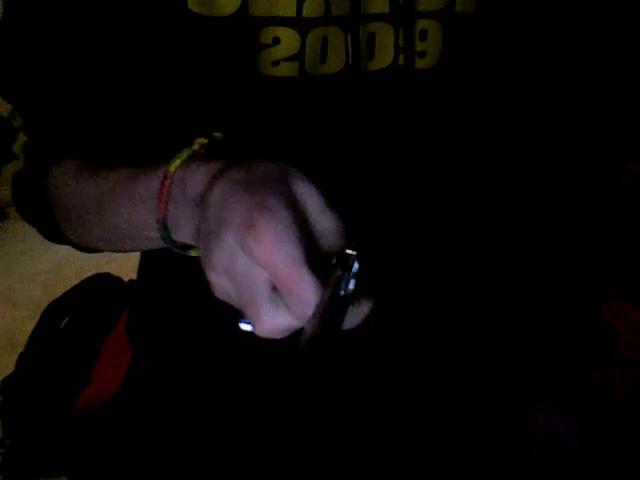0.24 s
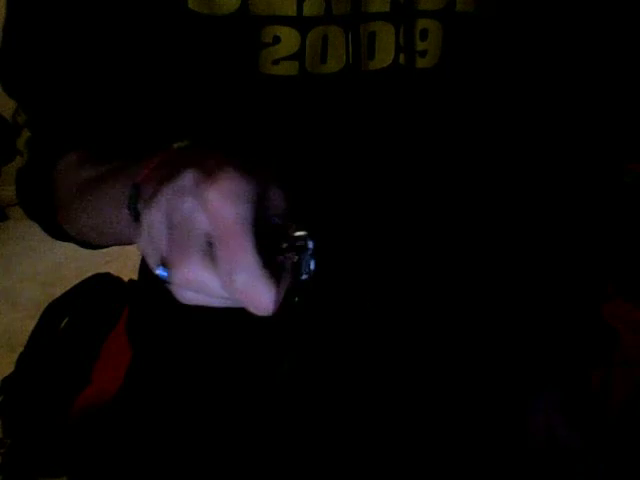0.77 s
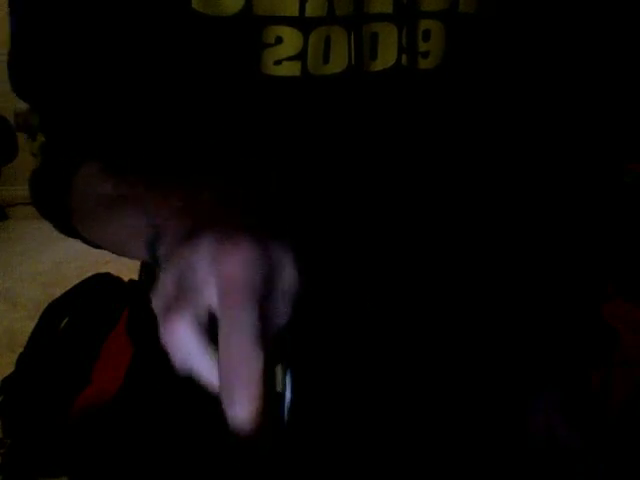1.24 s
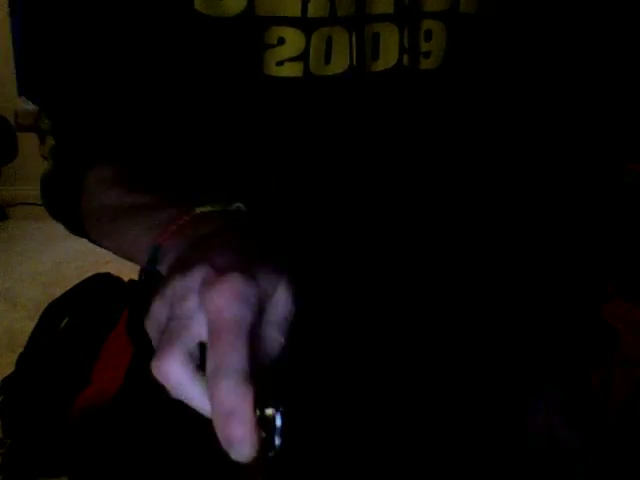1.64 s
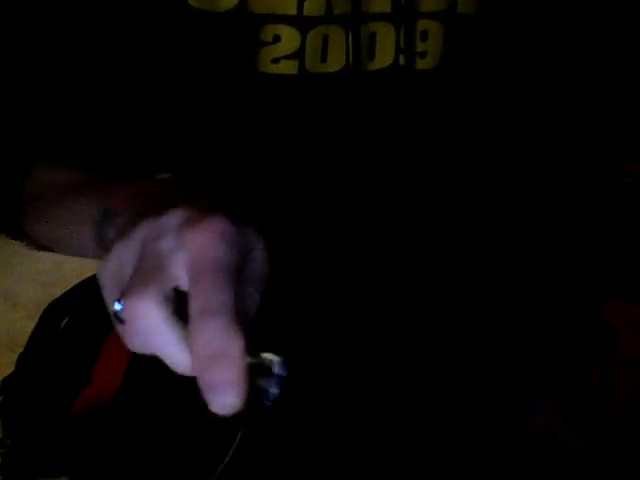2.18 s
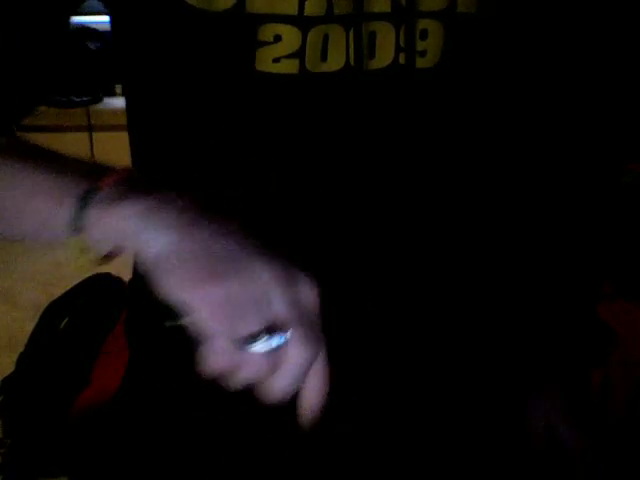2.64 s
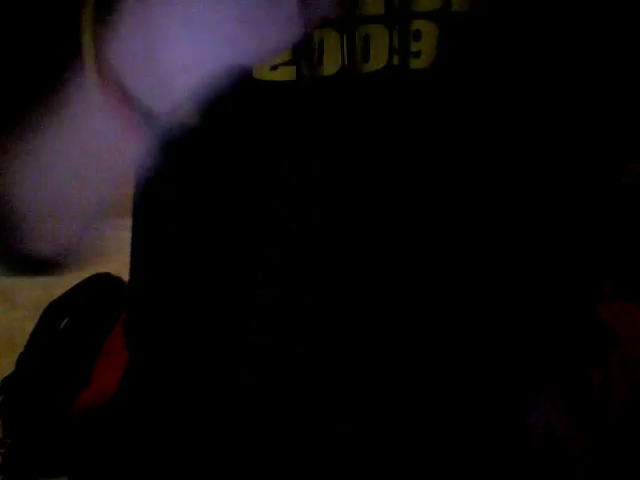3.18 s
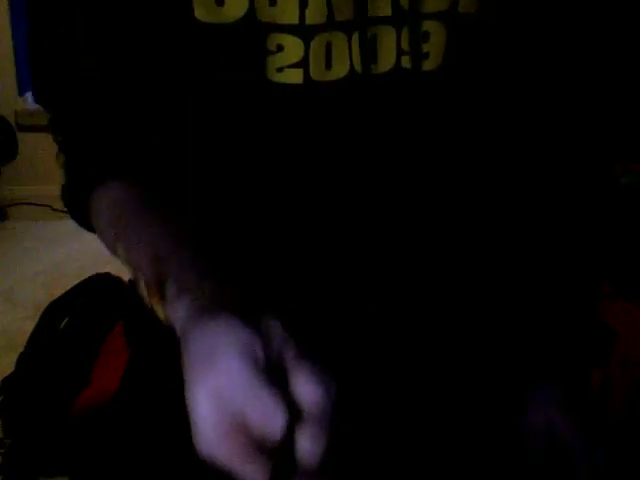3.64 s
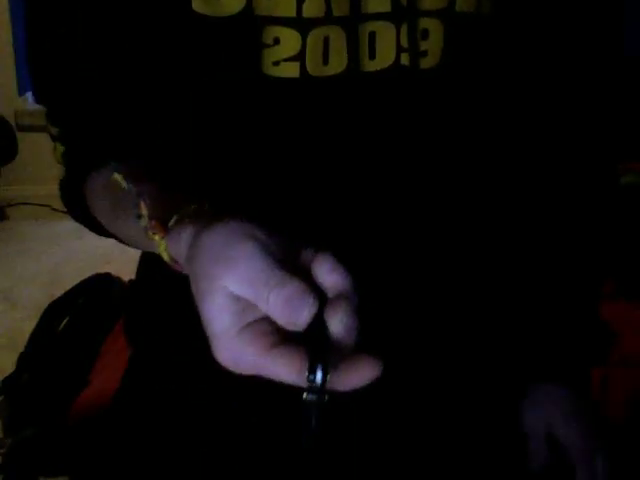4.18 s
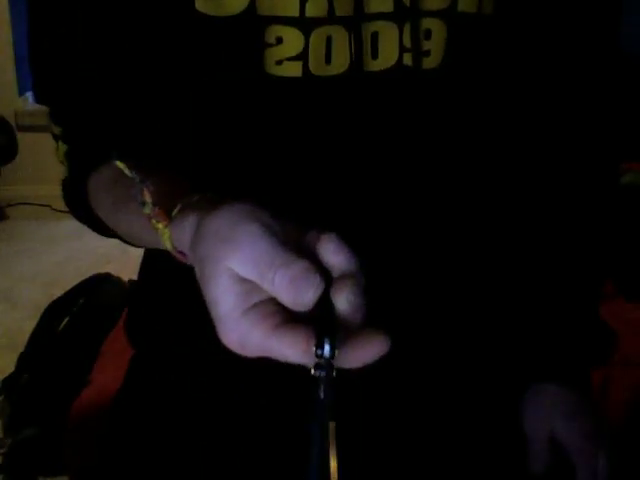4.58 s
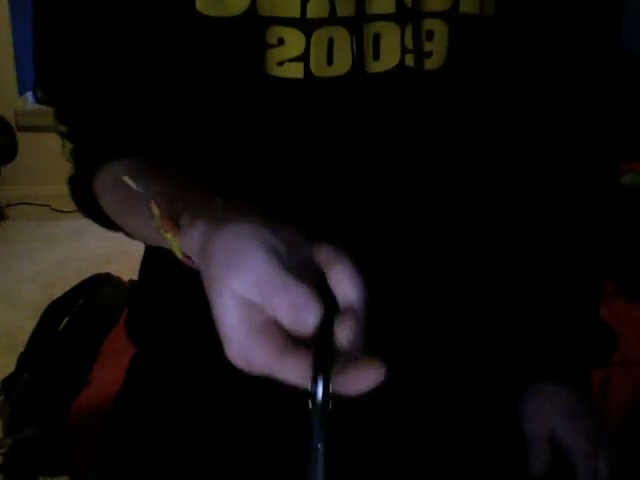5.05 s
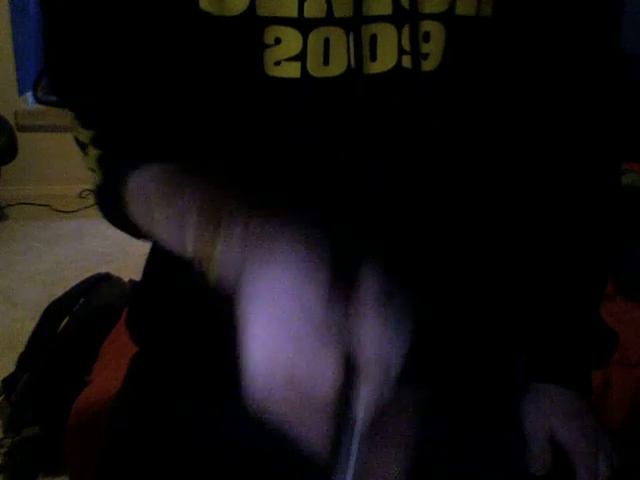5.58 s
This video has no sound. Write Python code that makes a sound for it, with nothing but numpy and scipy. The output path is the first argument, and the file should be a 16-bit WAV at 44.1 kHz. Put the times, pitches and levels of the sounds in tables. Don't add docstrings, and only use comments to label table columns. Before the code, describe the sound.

A folding knife with two steel handles is flipped close to the microphone, clacking and rattling in bursts over faint hum and camera whine.

```python
import sys
import numpy as np
from scipy import signal
from scipy.fft import rfft, irfft, next_fast_len
from scipy.io import wavfile
from scipy.ndimage import uniform_filter1d

SR = 44100
rng = np.random.default_rng(int(sys.argv[2]) if len(sys.argv) > 2 else 0)


def gain_from_decibels(decibels):
    exponent = np.asarray(decibels, float) / 20
    return 10 ** exponent


def unload_audio(sound):
    columns = np.transpose(np.atleast_2d(sound))
    steps = np.round(np.clip(columns, -1, 1) * 32767)
    wavfile.write(sys.argv[1], SR, steps.astype(np.int16))


N = 256220
SIZE = next_fast_len(N)


def evened(x):
    return x / np.sqrt(np.mean(x ** 2) + 1e-20)


def read(points, hz):
    f, value = np.transpose(points)
    return np.interp(np.log(hz + 1), np.log(f + 1), value)


def add(mix, s, sound):
    part = mix[round(s * SR):][:len(sound)]
    part += sound[:len(part)]


def shaped(x, points):
    return irfft(rfft(x) * gain_from_decibels(read(points, np.fft.rfftfreq(len(x), 1 / SR))), len(x))


def coloured(points, size):
    z = rfft(rng.standard_normal(size))
    return evened(irfft(z * gain_from_decibels(read(points, np.fft.rfftfreq(size, 1 / SR))), size))


def ring(hz, db, t60, phase=0):
    t = np.arange(round(min(t60, .4) * SR)) / SR
    twin = 0.23 * np.sin(2 * np.pi * (hz * 1.006 * t + rng.random())) * gain_from_decibels(-60 * t / 0.24)
    onset = (1 - np.exp(-t / 0.00012)) ** 2
    return gain_from_decibels(db - 60 * t / t60) * (np.sin(2 * np.pi * hz * t + phase) + twin) * onset


# f/Hz, level/dB
STEEL_MODES = [(1750, -20.5), (2450, -24), (3300, -14), (4780, -3.5), (5150, -5.5), (5680, -10),
               (6120, -0.5), (6700, -8.5), (7100, -3.5), (7460, 0), (7950, -3.5), (8650, -8), (9330, -34),
               (10300, 1.5), (10650, -16.5), (11780, -21), (12700, -8.5), (13900, -5), (15000, -3)]


def modes(t60):
    out = np.zeros(4096)
    chances = rng.random((len(STEEL_MODES), 3))
    for (hz, db), (share, detune, turn) in zip(STEEL_MODES, chances):
        add(out, 0, ring(hz * (.97 + 0.051 * detune), db - 12 * share, t60, 2 * np.pi * turn))
    return out


# f/Hz, level/dB per Hz
CRACK_SPECTRUM = [(700, -6), (1500, -11), (3000, -9), (4300, -12.5), (5500, 1.5), (7500, 0), (9000, -0.5),
                  (11000, 1), (13000, -13), (16500, -20)]


def knock(db, ring_hz, treble_db, body_db, t60):
    out = gain_from_decibels(-9) * modes(0.62 * t60)
    add(out, 0, ring(ring_hz, -9.5, t60))
    t = np.arange(4096) / SR
    tick = gain_from_decibels(0.5 + 0.15 * (db + 23) - 60 * t / 0.006) * np.minimum(t / .0003, 1)
    chatter = gain_from_decibels(-3 - 60 * t / (.5 * t60 + 0.0042)) + gain_from_decibels(-25.5 - 60 * t / 0.13)
    out += gain_from_decibels(-2.5) * shaped(rng.standard_normal(len(t)) * (tick + chatter), CRACK_SPECTRUM)
    colour = [(900, body_db + 18), (1500, body_db + 20.5), (3600, body_db + 22.5), (4600, 0), (8000, 0),
              (8800, treble_db + 10), (12000, treble_db + 5.5), (13500, treble_db)]
    return gain_from_decibels(db) * shaped(out, colour)[:-200]


# t/s, peak level/dB, main ring f/Hz, treble/dB, body/dB
HARD_CLACKS = [(0.0103, -37, 5860, -18, -19), (0.252, -38, 5920, -23, -19), (1.0536, -32, 5590, -13, -16),
               (1.1267, -35, 7330, -11, -26), (2.4044, -37, 7300, -9.5, -32), (2.6266, -39, 5370, -14, -11),
               (2.7033, -30, 5480, -5.5, -15), (2.7076, -31.5, 7400, -7, -17),
               (2.7145, -28.5, 6550, -12, -30), (2.783, -39.5, 7280, -5.5, -14),
               (2.8949, -36.5, 5900, -12, -17.5), (3.05, -26.5, 5920, -7, -18),
               (3.2688, -29, 7640, -15, -26), (3.2755, -21.5, 5680, -17, -28.5),
               (3.2807, -19, 7690, -10.5, -30), (3.2842, -23, 5520, -10, -22),
               (3.3251, -28, 7230, -8.5, -33), (3.4049, -26, 5750, -12, -18.5),
               (3.4102, -26, 7660, -3, -21), (3.488, -28.5, 7750, -16, -25),
               (3.5786, -32, 7500, -13, -16.5), (5.1074, -15.5, 6800, -10, -39),
               (5.13, -27.5, 6300, -18, -24), (5.3264, -31.5, 7230, -8.5, -24)]
# t/s, peak level/dB, main ring f/Hz
DULL_TOUCHES = [(0.2457, -44, 6020), (0.2648, -41.5, 5600), (0.2931, -44, 6530), (0.9232, -46, 7580),
                (0.993, -49, 5990), (1.0155, -46, 7400), (1.041, -44, 5910), (1.0667, -42, 5900),
                (1.2345, -46, 5800), (1.4106, -47, 5860), (1.8413, -44.5, 5800), (1.3325, -53, 6000),
                (2.65, -47, 6040), (2.6627, -41.5, 5590), (2.854, -45.5, 5890), (2.9208, -44, 5830),
                (3.4, -34, 6790), (4.186, -45.5, 6000), (5.1586, -52, 6110), (5.1814, -53, 6240),
                (5.3544, -45, 7140)]
# t/s, peak level/dB, main ring f/Hz
EDGE_GRAZES = [(0.6488, -51, 6280), (1.0966, -48, 6010), (1.199, -43, 5600), (2.6814, -55, 7080),
               (3.0283, -41.5, 5740), (3.426, -37, 6700), (3.452, -38, 5950), (3.462, -37, 5580),
               (3.5595, -43, 6900), (4.0012, -49, 5800), (4.337, -51, 5960), (5.1414, -48, 7750),
               (5.1926, -48, 5870), (5.3354, -53, 7510), (5.3794, -56, 7150), (5.6544, -51.5, 5900),
               (5.6968, -48, 5640)]


def knocks():
    light_t60_s = 0.033
    touch_treble_db, touch_body_db = -21, -21.5
    graze_treble_db, graze_body_db = -10, -18
    blows = [(*row, 0.035 * np.exp(-0.03 * (row[1] + 30))) for row in HARD_CLACKS]
    blows += [(*row, touch_treble_db, touch_body_db, light_t60_s) for row in DULL_TOUCHES]
    blows += [(*row, graze_treble_db, graze_body_db, light_t60_s) for row in EDGE_GRAZES]
    out = np.zeros(N)
    for s, *blow in blows:
        add(out, s + .001, knock(*blow))
    return out


PART_HZ = {"blade": 8188, "tang": 4570, "latch": 5900, "pin": 7465, "tip": 11850, "spine": 10350, "handle":
           7955, "edge": 11740, "slot": 10620, "grip": 1750, "bolt": 6115, "stop": 5200, "washer": 13900,
           "rib": 9500, "heel": 4200, "key": 7200, "tail": 4786}
# part, level/dB, t60/s
SWING_RINGS = [
    ("blade", -30.5, 0.23),
    ("tang", -54, .5),
    ("tail", -46, .04),
    ("latch", -43, .06),
    ("pin", -44, .079),
    ("tip", -33.5, .05),
    ("tip", -54, .2),
    ("spine", -35, .03),
]
# part, level/dB, t60/s
SHUT_RINGS = [
    ("handle", -24, 0.047),
    ("edge", -37, .11),
    ("slot", -22, 0.036),
    ("bolt", -29, .025),
    ("key", -14, .009),
    ("grip", -45, .025),
    ("tail", -41, .05),
]
# t/s, part, level/dB, t60/s
LONE_RINGS = [(.008, "spine", -60, .036), (1.054, "spine", -53, .07), (1.054, "tip", -50, .06),
              (1.127, "pin", -39, .06), (1.127, "spine", -50, 0.099), (1.842, "latch", -59, .047),
              (2.705, "spine", -43, .04), (2.716, "tip", -52, .05), (3.282, "latch", -43, .044),
              (3.286, "washer", -52, .04), (3.325, "blade", -50, .26), (3.406, "tang", -59, .16),
              (3.427, "rib", -31.5, .03), (3.4893, "handle", -26, .023), (3.579, "tip", -51, .06),
              (3.6, "tang", -65, .5), (5.1312, "handle", -32.5, 0.051), (5.16, "bolt", -44, 0.058),
              (5.193, "heel", -53, .03), (5.328, "key", -54, .16), (5.328, "stop", -50, .068)]


def ringing_parts():
    swing_s, shut_s = 3.0512, 5.1087
    rings = [(swing_s, *row) for row in SWING_RINGS] + [(shut_s, *row) for row in SHUT_RINGS]
    out = np.zeros(N)
    for s, part, db, t60 in rings + LONE_RINGS:
        sound = ring(PART_HZ[part], db, t60)
        flutter = evened(uniform_filter1d(rng.standard_normal(len(sound)), 300))
        onset = np.minimum(np.arange(len(sound)) / (.0003 * SR), 1)
        add(out, s, sound * gain_from_decibels(1.5 * flutter) * onset)
    return out


def rattle(length, db, treble_db):
    size = round(length * SR)
    hits = rng.random(size) < 1200 / SR
    taps = hits * gain_from_decibels(2.9 * rng.exponential(1, size)) * rng.choice([-1, 1], size)
    taps = taps * signal.windows.tukey(size, .5)
    colour = [(1200, -5), (3000, -3), (8000, 2.5), (9000, treble_db), (12000, treble_db),
              (13500, treble_db - 10)]
    out = shaped(signal.fftconvolve(taps, modes(0.015)), colour)
    return gain_from_decibels(db) * out / np.sqrt(np.mean(out[:size] ** 2) + 1e-20)


# t/s, length/s, rms level/dB, treble/dB
HANDLE_RATTLES = [(0.249, 0.068, -65, -12), (1.052, .025, -56, -5), (1.1265, .012, -46, -3),
                  (3.056, 0.13, -59, -9), (3.27, .018, -44, -6), (3.288, 0.042, -51, -3),
                  (3.329, .04, -59, -2), (3.401, 0.018, -40, -6), (3.424, .03, -55, 0),
                  (3.463, .018, -49, -10), (3.4855, 0.0065, -41.5, -9), (3.578, 0.025, -45.5, 1),
                  (3.599, 0.05, -59, -2), (5.094, .013, -66, -14), (5.324, 0.0097, -50.5, -2)]


def rattles():
    out = np.zeros(N)
    for s, *shake in HANDLE_RATTLES:
        add(out, s, rattle(*shake))
    return out


# t/s, length/s, f/Hz, level/dB
PIVOT_SQUEAKS = [(.005, 0.016, 5850, -46), (0.251, 0.029, 5900, -57), (1.036, 0.019, 6000, -54.5),
                 (1.412, 0.028, 5880, -65), (3.65, .017, 8400, -51.5), (3.665, 0.038, 8500, -55.5),
                 (4.001, .06, 5900, -65.5), (4.067, 0.034, 5830, -72), (4.554, 0.083, 5880, -70.5),
                 (3.103, .014, 5950, -58), (3.464, .014, 8300, -48)]


def squeaks():
    out = np.zeros(N)
    for s, length, hz, db in PIVOT_SQUEAKS:
        size = round(length * SR)
        pitch_slip, level_slip = evened(uniform_filter1d(rng.standard_normal((2, size)), 150))
        tone = np.sin(2 * np.pi * np.cumsum(hz + 40 * pitch_slip) / SR) * gain_from_decibels(4.0 * level_slip)
        add(out, s, gain_from_decibels(db + 2) * tone * signal.windows.tukey(size, .4))
    return out


def knife():
    return knocks() + ringing_parts() + rattles() + squeaks()


# t/s, f/Hz, level/dB, length/s
SEAT_BUMPS = [(1.25, 165, -56, 0.087), (3.44, 198, -55.5, 0.078), (3.55, 170, -49, 0.12),
              (3.57, 237, -54, 0.074), (3.57, 88.5, -53, 0.097), (3.72, 91, -49.5, 0.065),
              (3.81, 75, -50, .1), (3.86, 200, -55, 0.065), (4.08, 180, -57, .08), (4.21, 213.5, -56, 0.1),
              (4.22, 148, -52, 0.11), (4.6, 181.4, -56, 0.074), (4.84, 158, -48.5, 0.09),
              (4.95, 149, -61, .06), (5.22, 140, -48, 0.12), (5.23, 252, -57.5, 0.079), (5.3, 85, -55, .08),
              (5.33, 236, -51.5, 0.13), (5.36, 170.5, -54, .1), (5.44, 279, -59, 0.084)]


def seat():
    out = np.zeros(N)
    for s, hz, db, length in SEAT_BUMPS:
        u = np.arange(round(1.5 * length * SR)) / (length * SR)
        swell = np.e * 4 * u * np.exp(-4 * u) * np.cos(np.pi * u / 3)
        cycles = hz * length * u * (1 - 0.03 * u) + rng.random()
        add(out, s, gain_from_decibels(db + 1.0) * swell * np.sin(2 * np.pi * cycles))
        puff = [(.5 * hz, -30), (.7 * hz, 0), (1.5 * hz, -3), (3 * hz, -30), (6 * hz, -80)]
        add(out, s, gain_from_decibels(db - 9) * swell * coloured(puff, len(u)))
    return out


# f/Hz, t60/s
ROOM_T60 = [(500, 0.29), (3000, 0.27), (8000, 0.24), (15000, 0.04)]


def room(x):
    taps = np.zeros(SR // 2)
    at = np.arange(100, len(taps) - 20, 20)
    taps[at + rng.integers(0, 20, len(at))] = rng.choice([-1., 1.], len(at))
    hz, t, z = signal.stft(taps, SR, nperseg=128)
    decay = gain_from_decibels(-60 * t / read(ROOM_T60, hz)[:, None])
    tail = signal.istft(z * decay, SR, nperseg=128)[1]
    return signal.fftconvolve(x, tail / np.linalg.norm(tail))[:N]


# f/Hz, rms level/dB
READOUT_TONES = [(3025, -87), (4215, -91), (4484, -91), (4958, -82), (5410, -88), (5706, -88), (6153, -88),
                 (9210, -91), (9458, -90), (9840, -84), (9916, -83), (10282, -88), (10588, -84),
                 (10664, -84), (11041, -78), (11116, -85), (11493, -85), (11794, -85), (12000, -87),
                 (12214, -84), (12505, -84), (12876, -85), (12955, -77), (13334, -88), (13415, -89),
                 (13705, -89), (14088, -93), (15310, -80), (15546, -94)]
# f/Hz, level/dB
READOUT_HISS = [(3000, -27), (4500, -7.5), (8000, -9.5), (10000, -5.5), (12500, -5), (14000, -9),
                (15600, -10), (15900, -60)]


def camera():
    frame_s, first_s, busy_s = .0667533, -.0021, .0318
    bus_hz, row_hz = 7999.77, 15252
    t = np.arange(N) / SR
    since = (t - first_s) % frame_s
    frame = ((t - first_s) // frame_s).astype(int)
    busy = uniform_filter1d(1. * (since < busy_s), 20)
    tones = np.zeros(N)
    for hz, db in READOUT_TONES:
        turn = rng.random() + 0.24 * rng.random(frame[-1] + 1)[frame]
        tones += gain_from_decibels(db + 3.5) * np.sin(2 * np.pi * (hz * since + turn))
    bus = np.sin(2 * np.pi * bus_hz * t) * (gain_from_decibels(-54) * busy + gain_from_decibels(-81))
    flip = uniform_filter1d(np.sign(since - frame_s / 2), size=24)
    rows = gain_from_decibels(-67.5) * np.sin(2 * np.pi * row_hz * (since % (frame_s / 2))) * flip
    hiss = gain_from_decibels(-69) * coloured(READOUT_HISS, SIZE)[:N]
    return bus + rows + busy * (gain_from_decibels(0.7) * tones + hiss)


# f/Hz, rms level/dB
HUM_TONES = [(120.1, -55), (59.7, -69), (968.3, -83), (1150, -84), (2605, -89)]


def hum():
    t = np.arange(N) / SR
    wavers = evened(uniform_filter1d(rng.standard_normal((len(HUM_TONES), N)), 4000))
    out = np.zeros(N)
    for (hz, db), waver in zip(HUM_TONES, wavers):
        out += gain_from_decibels(db + 2.5 + 1.07 * waver) * np.sin(2 * np.pi * hz * t)
    return out


# f/Hz, level/dB per Hz
WASH_SPECTRUM = [(22, -10), (45, -4), (90, 0), (200, -1), (400, -6), (900, -11), (1300, -15), (2700, -20),
                 (3500, -29), (4200, -30), (6000, -25), (8000, -27), (11500, -33), (13500, -34.5),
                 (15000, -37)]
# f/Hz, likeness [0 to 1]
CHANNEL_LIKENESS = [(25, .985), (60, 0.98), (130, 1), (290, .95), (640, 0.94), (1400, 0.86), (3100, 0.91),
                    (6800, 0.84), (11000, 0.65), (15000, .5)]


def wash():
    edge_hz, level_db = 15000, -56
    hz = np.fft.rfftfreq(SIZE, 1 / SR)
    same = read(CHANNEL_LIKENESS, hz)
    mid, side = rfft(rng.standard_normal((2, SIZE))) * gain_from_decibels(read(WASH_SPECTRUM, hz)) * (hz < edge_hz)
    mid = mid * np.sqrt(1 + same)
    side = side * np.sqrt(1 - same)
    return gain_from_decibels(level_db) * evened(irfft(np.array([mid + side, mid - side]), SIZE)[:, :N])


def scene():
    steel = knife()
    return steel + gain_from_decibels(-15.5) * room(steel) + seat() + camera() + hum() + wash()


def low_pass(x):
    return signal.sosfilt(signal.butter(12, 16930, fs=SR, output="sos"), x)


def record(dry):
    left_lag = .48
    hz = np.fft.rfftfreq(SIZE, 1 / SR)
    z = rfft(dry, SIZE) * gain_from_decibels(read([(15700, 0), (16000, -14), (16900, -20)], hz))
    z[0] *= np.exp(-2j * np.pi * hz / SR * left_lag)
    mix = irfft(z, SIZE)[:, :N]
    return low_pass(mix)


dry = scene()
out = record(dry)
unload_audio(out)
```